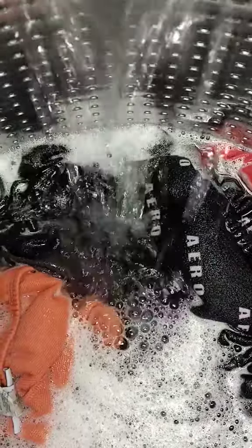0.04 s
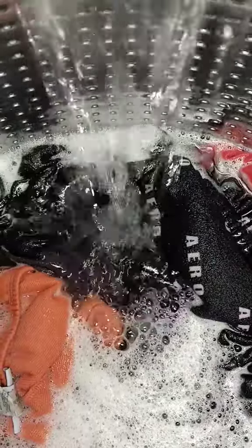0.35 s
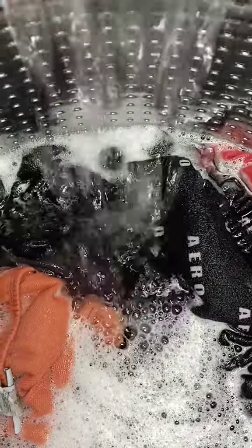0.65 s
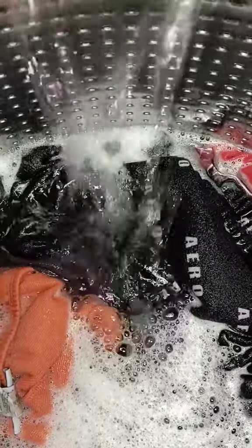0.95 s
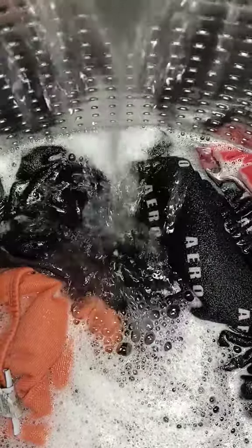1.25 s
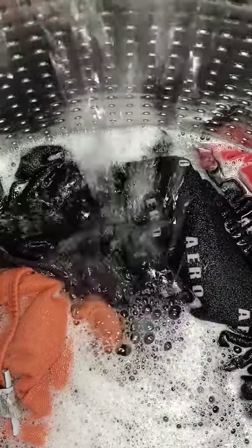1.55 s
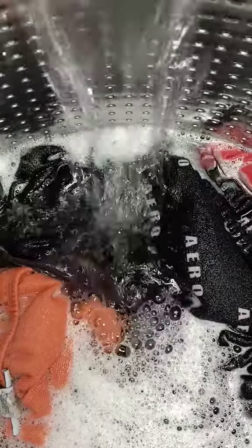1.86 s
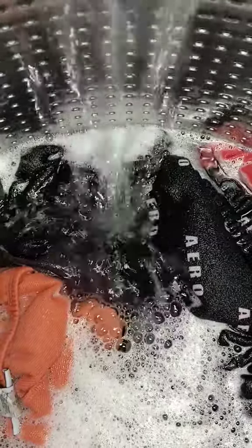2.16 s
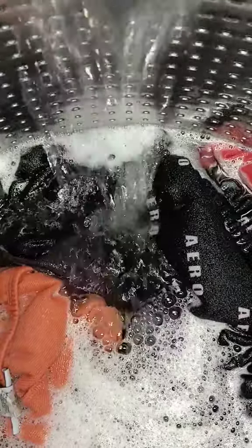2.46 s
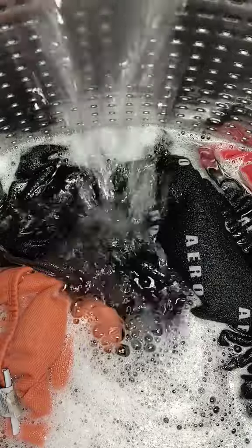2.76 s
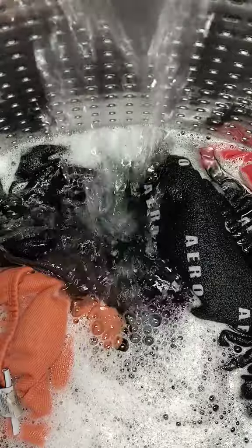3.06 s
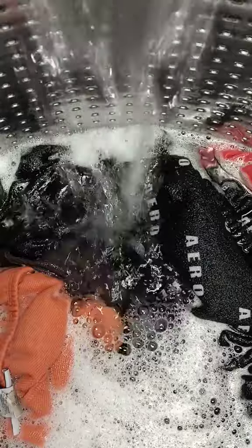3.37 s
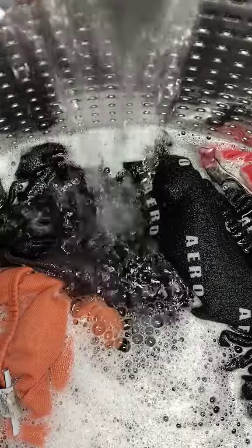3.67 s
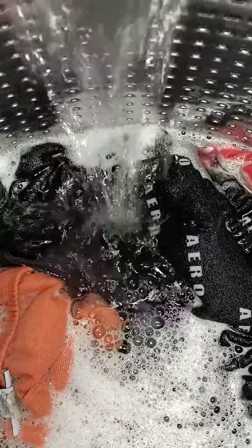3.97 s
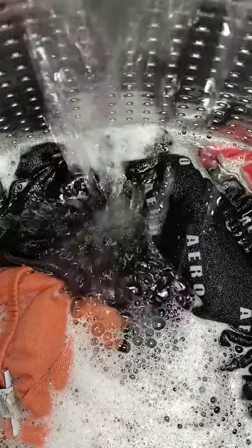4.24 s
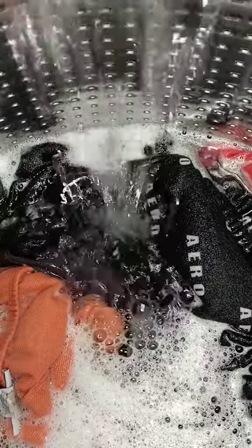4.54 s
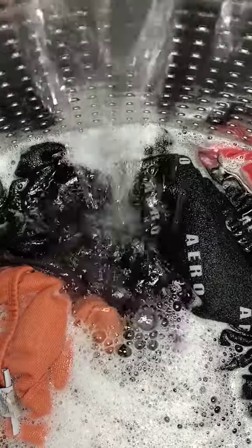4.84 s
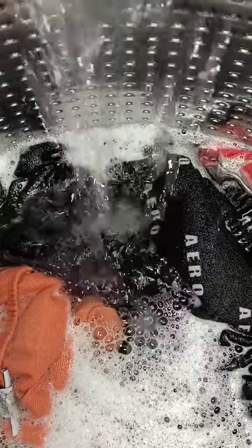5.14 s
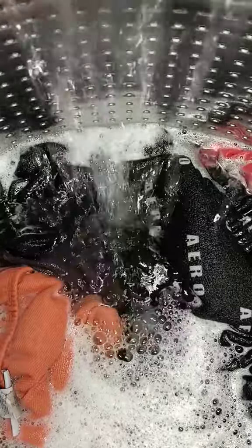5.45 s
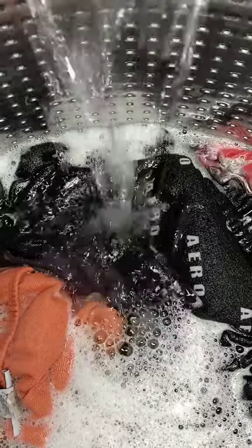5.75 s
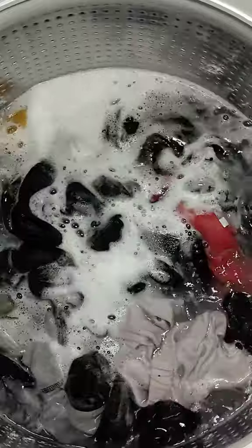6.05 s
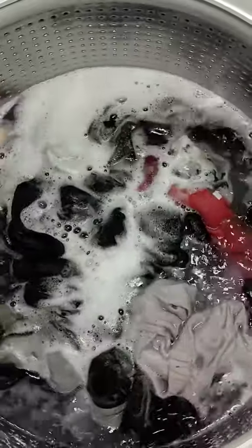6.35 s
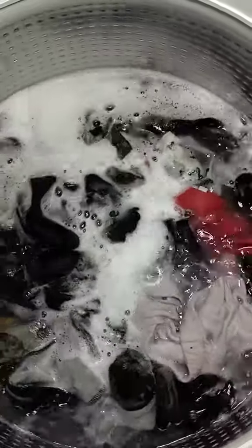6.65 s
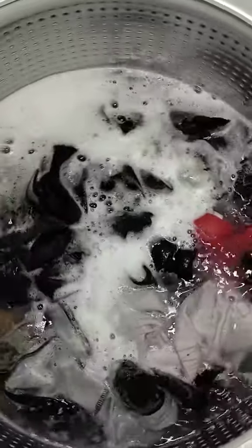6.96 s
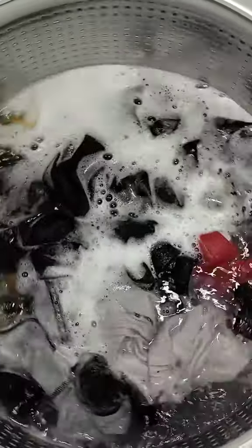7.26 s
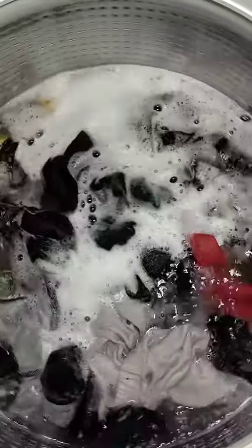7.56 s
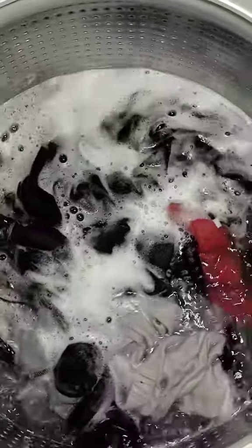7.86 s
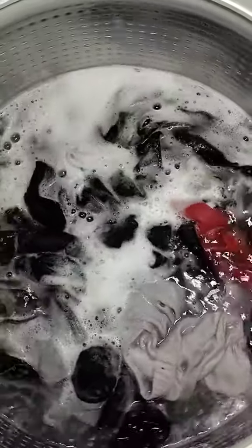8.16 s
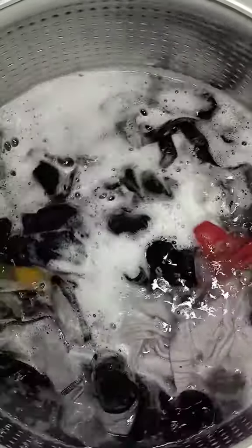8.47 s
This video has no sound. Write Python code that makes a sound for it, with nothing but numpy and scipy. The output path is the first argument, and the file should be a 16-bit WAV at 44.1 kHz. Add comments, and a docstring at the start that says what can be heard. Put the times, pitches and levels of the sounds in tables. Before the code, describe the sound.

Water pours and splashes onto laundry in a washing machine drum, then the washer agitates in three low, churning strokes.

```python
"""First a jet pours onto wet laundry in the steel drum of a top-loading washer: drop impacts and ringing
bubbles excite the drum's resonances, spray hisses and the shaken tub rumbles and thumps.
At 5.6 s the sound cuts off; after a short silence the washer is agitating, in three motor strokes.
Each stroke starts with a knock, groans up to speed, whines at harmonics of the gear mesh rate
while the load churns and the foam fizzes, then coasts down with a falling growl."""
import sys
import numpy as np
from scipy import signal
from scipy.fft import rfft, irfft
from scipy.io import wavfile

SR = 44100
rng = np.random.default_rng(int(sys.argv[2]) if len(sys.argv) > 2 else 0)


def wrap_up_sound(samples):
    """Save the sound to the file named by the first command line argument, as 16-bit audio."""
    columns = np.atleast_2d(samples).T
    # keep every value between -1 and 1, then stretch to whole-number steps
    tamed = np.clip(columns, -1, 1)
    steps = np.round(tamed * 32767).astype(np.int16)
    wavfile.write(sys.argv[1], SR, steps)


N = 375291
T = np.arange(N) / SR
POUR_END_S, WASH_START_S = 5.603, 6.04


def gain_of(db):
    """Amplitude ratio of a level in decibels."""
    return 10 ** (np.asarray(db) / 20)

def unit_rms(x):
    """Normalisation to an rms of 1."""
    return x / np.sqrt(np.mean(x ** 2) + 1e-20)

def add(mix, s, sound):
    """Superposition: a sound joins the mix at time s."""
    part = mix[max(round(s * SR), 0):][:len(sound)]
    part += sound[:len(part)]

def swell(peak_s, half_width_s):
    """Gaussian envelope, down to 1/e one half-width from its peak."""
    return np.exp(-((T - peak_s) / half_width_s) ** 2)

def wander(rate_hz):
    """Random modulation: low-passed noise of rms 1."""
    f = np.fft.rfftfreq(N, 1 / SR)
    return unit_rms(irfft(rfft(rng.standard_normal(N)) / (1 + (f / rate_hz) ** 4), N))

def colour(x, points=None, modes=(), size=8192):
    """Minimum-phase filter: a spectral envelope plus bell-shaped resonances and antiresonances."""
    f, db = np.fft.rfftfreq(size, 1 / SR), np.zeros(size // 2 + 1)
    if points is not None:
        hz, level = np.transpose(points)
        db += np.interp(np.log(f + 1), np.log(hz), level)
    for hz, width, lift in modes:
        db += lift / (1 + (2 * (f - hz) / width) ** 2)
    log_gain = np.log(gain_of(np.r_[db, db[-2:0:-1]]))
    response = np.fft.ifft(np.exp(np.conj(signal.hilbert(log_gain)))).real
    return signal.oaconvolve(x, response[:size // 2])[:len(x)]

def band(x, hz, spread):
    """Band-pass filter from hz / spread to hz * spread."""
    spread = max(spread, 1.05)
    edges = np.clip([hz / spread, hz * spread], 10, SR / 2 - 100)
    return signal.sosfilt(signal.butter(2, edges, "band", fs=SR, output="sos"), x)

def drops(per_s, spread_db):
    """Shot noise: independent impacts, many small and a few large."""
    return (rng.random(N) < per_s / SR) * gain_of(spread_db * np.minimum(rng.exponential(1, N), 3.4))

def spatter(lo_hz, hi_hz, per_s, spread_db, decay_s, crack, bed, count=6):
    """Impact noise: drops crack and puff in bands set by their size, over a bed of merged drops."""
    out = np.zeros(N)
    for hz in np.geomspace(lo_hz, hi_hz, count):
        hits = drops(per_s / count, spread_db)
        power = signal.lfilter([1], [1, -np.exp(-2 / (decay_s * SR))], hits ** 2)
        puffs = np.sqrt(power / power.mean() + bed ** 2) * rng.standard_normal(N)
        out += band(puffs + crack * unit_rms(hits), hz, 1.46)
    return unit_rms(out)

def bubbles(lo_hz, hi_hz, per_s, spread_db, cycles, rise):
    """Bubble resonance: damped oscillations, tuned by size, that rise in pitch near the surface."""
    out, draws = np.zeros(N), rng.random((8000, 4))
    born = draws[:, 3] < per_s * N / SR / len(draws)
    for when, pitch, strength, _ in draws[born]:
        hz = lo_hz * (hi_hz / lo_hz) ** pitch
        age = np.arange(int(5 * cycles / hz * SR)) * hz / cycles / SR  # in decay times
        amplitude = hz * gain_of(spread_db * min(-np.log(1 - strength), 3))
        ring = np.exp(-age) * np.sin(2 * np.pi * cycles * age * (1 + rise * age))
        add(out, when * N / SR, amplitude * ring)
    return unit_rms(out)

def burst(hz, spread, decay_s, crack, ring=0, modes=(), size=4096):
    """Impact transient: a crack, a puff and ringing air filtered by a body; rms 1 over the first 10 ms."""
    t = np.arange(size) / SR
    envelope = np.exp(-t / decay_s)
    puff = rng.standard_normal(size) * envelope
    puff[0] += crack
    bubble = envelope * np.sin(2 * np.pi * hz * t * (1 + 2 * t))
    sound = colour(unit_rms(band(puff, hz, spread)) + ring * unit_rms(bubble), modes=modes)
    return sound / np.sqrt(np.mean(sound[:SR // 100] ** 2))

def drum_echo(x, wet_db, t60_s, above_hz, size=6000):
    """Reverberation: the steel wall reflects the treble back and forth."""
    taps = rng.choice([-1., 1.], size) * (rng.random(size) < .03) * gain_of(-60 * T[:size] / t60_s)
    taps[:SR // 500] = 0  # no reflection in the first 2 ms
    high_pass = signal.butter(3, above_hz, "high", fs=SR, output="sos")
    taps = signal.sosfilt(high_pass, taps / np.linalg.norm(taps))
    return x + gain_of(wet_db) * signal.oaconvolve(x, taps)[:N]

# Resonances and antiresonances of the drum: f/Hz, bandwidth/Hz, gain/dB
DRUM_MODES = [(272, 24, -3.5), (427, 25, 9), (501, 150, 7.5), (651, 21, 4), (693, 31, -5.5),
              (844.4, 45, 10), (1028, 200, 8.5), (1398, 48, 8.5), (1759, 140, 11), (1923, 30, 4.5),
              (2086, 72, 8), (2330, 46, 5.5), (2508, 36, 3.5), (2776, 72, 8), (3100, 70, 7.5),
              (4170, 90, 4.5)]
# Spectrum of the splash: f/Hz, relative level/dB
SPLASH_SPECTRUM = [(300, -29), (900, -15), (1500, -3), (2500, -1), (4400, 0.5), (5700, 0), (6800, -5.5),
                   (10000, -7.5), (16000, -42.5)]
def splash():
    """Impacts and entrained bubbles excite the drum's modes as the jet breaks up in clumps."""
    splats = spatter(1070, 6500, per_s=310, spread_db=5.5, decay_s=0.014, crack=0.13, bed=0.69)
    splats += gain_of(-9.5) * bubbles(1200, 5000, per_s=400, spread_db=5, cycles=13, rise=0.01)
    air_pockets = gain_of(-9) * bubbles(1600, 2400, per_s=90, spread_db=4, cycles=15, rise=0.022)
    clumping = gain_of(1.14 * wander(15))
    in_drum = colour((splats + air_pockets) * clumping, SPLASH_SPECTRUM, DRUM_MODES)
    return gain_of(-35.5) * unit_rms(drum_echo(in_drum, wet_db=-10.5, t60_s=0.48, above_hz=2500))

# Spectrum of the gurgle: f/Hz, relative level/dB
GURGLE_SPECTRUM = [(100, -25), (190, -1), (280, -2.5), (500, -6.5), (680, -3), (1000, -6), (1300, -3.5),
                   (2000, -21.5), (5000, -25.5)]
def gurgle():
    """Larger bubbles resonate lower, among dull impacts in the drum."""
    glugs = spatter(220, 1630, per_s=190, spread_db=1.5, decay_s=0.012, crack=0.31, bed=0.29)
    glugs += gain_of(-9) * bubbles(350, 1400, per_s=130, spread_db=7, cycles=6.9, rise=0.025)
    return gain_of(-41.5) * unit_rms(colour(glugs, GURGLE_SPECTRUM, DRUM_MODES))

# Spectrum of the spray: f/Hz, relative level/dB
SPRAY_SPECTRUM = [(2000, -26), (5000, -12.5), (7000, -9.5), (8500, -9), (11200, -1), (12000, -4),
                  (13500, 3), (16000, -2)]
def spray():
    """The smallest drops and bubbles radiate the highest frequencies."""
    mist = spatter(8000, 14000, per_s=390, spread_db=6, decay_s=0.013, crack=0.2, bed=0.8, count=2)
    mist += gain_of(-11.5) * bubbles(6500, 15000, per_s=430, spread_db=5, cycles=30, rise=.004)
    return gain_of(-39.5) * unit_rms(colour(mist, SPRAY_SPECTRUM))

# Moments when the jet falls slack: t/s, half-width/s, gain/dB
JET_LULLS = [(0.595, 0.023, -5), (0.961, 0.018, -5), (1.397, 0.046, -5), (3.948, .05, -2.5),
             (5.409, 0.03, -2)]
def jet():
    """Flow modulates level: the jet slackens at times, and thins as each big gout draws water from it."""
    slack = gain_of(sum(db * swell(s, half_width) for s, half_width, db in JET_LULLS))
    thinning = gain_of(-5.5 * sum(swell(s - 0.005, 0.0065) for s, *_ in BIG_GOUTS))
    return ((splash() + gurgle()) * slack + spray()) * thinning

# Spectrum of the tub's rumble: f/Hz, relative level/dB
RUMBLE_SPECTRUM = [(20, -22), (38, -21), (51, 0), (85, -0.5), (105, 1), (122, 4.5), (140, -3.5), (150, -5),
                   (175, -22.5), (300, -30.5)]
def rumble():
    """Forced vibration: the tub shakes unevenly under the jet."""
    return gain_of(-38.5 + 1.5 * wander(22)) * unit_rms(colour(rng.standard_normal(N), RUMBLE_SPECTRUM))

# Hum while filling: harmonic number, level/dB
FILLING_HARMONICS = [(1, -45), (2, -61.5)]
def hum(harmonics, waver, waver_hz, hum_hz=120):
    """Mains hum: a harmonic series wavering in amplitude and phase."""
    out, phase = np.zeros(N), 2 * np.pi * hum_hz * T
    for k, db in harmonics:
        amplitude = gain_of(db) * np.sqrt(2) * (1 + waver * wander(waver_hz))
        out += amplitude * np.sin(k * phase + waver * wander(8.4))
    return out

# Sharpest impacts of drops on steel: t/s, relative level/dB
LOUD_TICKS = [(0.0328, -18), (0.059, -12), (0.1756, -9), (0.2448, -17), (0.6752, -15.5), (1.0133, -14),
              (1.121, -26), (1.829, -9), (2.2624, -16), (2.5847, -9), (3.066, -20.5), (3.2456, -18),
              (3.3662, -15), (3.738, -10), (3.7927, -25), (3.8312, -27), (3.872, -13), (4.0297, -19),
              (4.1037, -30), (4.1533, -10), (4.5687, -14), (4.8313, -6), (4.937, -9), (5.144, -13)]
# Spectral shaping of a tick: f/Hz, gain/dB
TICK_SPECTRUM = [(400, -24.5), (2000, -7), (4500, 4), (7500, -8), (14000, -3.5)]
def ticks():
    """Brief contact gives a broad spectrum: fast drops tick on steel, a few loud over a fine patter."""
    hits = gain_of(-48) * unit_rms(drops(per_s=60, spread_db=3.5) * rng.choice([-1., 1.], N))
    for s, db in LOUD_TICKS:
        hits[round(s * SR)] += gain_of(db + 2.5)
    slap = 0.27 * rng.standard_normal(256) * np.exp(-T[:256] / 0.00095)
    slap[0] = 1
    return colour(signal.oaconvolve(hits, slap)[:N], TICK_SPECTRUM, size=1024)

def splat(hz, spread, ring, landing_s, decay_s, crack, count=5, size=4096):
    """Close impacts fuse into one, each with a puff and a rising bubble; rms 1 over the first 10 ms."""
    puff_power, ringing = np.zeros((2, size))
    for k, (when, pitch, phase) in enumerate(rng.random((count, 3))):
        onset = landing_s * (k + when * (k > 0)) / count
        age = np.maximum(T[:size] - onset, 0)
        envelope = gain_of(-2 * k) * np.minimum(age / 0.00034, 1) * np.exp(-age / decay_s)
        bubble_hz = hz * spread ** (.9 * (pitch - .5))
        puff_power += envelope ** 2
        ringing += envelope * np.sin(2 * np.pi * (phase + bubble_hz * age * (1 + 6 * age)))
    puff = rng.standard_normal(size) * np.sqrt(puff_power)
    puff[SR // 1000] += crack
    sound = unit_rms(band(puff, hz, spread)) + ring * unit_rms(ringing)
    sound = colour(sound, modes=DRUM_MODES, size=4096)
    return sound / np.sqrt(np.mean(sound[:SR // 100] ** 2))

def small_gouts(count=26, lo_hz=1014, hi_hz=6480):
    """Random scatter of lesser gouts, as rows like BIG_GOUTS: finer ones sound higher and spray more."""
    rows = []
    for k, (when, strength, fineness) in enumerate(rng.random((count, 3))):
        s = POUR_END_S * (k + when) / count
        db = -39 + 8.5 * (2 * strength - 1)
        hz = lo_hz * (hi_hz / lo_hz) ** fineness
        rows.append((s, db, hz, 1.35, -35.5 + 9 * (fineness - .5)))
    return rows

# Big gouts hitting the load: t/s, onset level/dB, centre f/Hz, band spread (ratio), spray level/dB
BIG_GOUTS = [(0.032, -31, 2780, 2.5, -41), (0.061, -30.5, 4770, 1.2, -25.5),
             (0.157, -30.5, 2120, 1.26, -41), (0.565, -36.5, 5550, 1.2, -28.5), (0.674, -27, 3020, 2, -48),
             (0.812, -33.5, 1780, 2, -37), (1.008, -30.5, 5020, 1.15, -35), (1.12, -27.5, 1860, 1.7, -58.5),
             (1.263, -31, 1760, 1.7, -48), (1.756, -28.5, 1043, 2.5, -34), (2.258, -29, 2350, 2, -29),
             (2.315, -27, 1704, 1.23, -46), (2.455, -23.5, 1946, 1.44, -51),
             (2.505, -27.5, 1784, 1.86, -35), (2.524, -28.5, 4200, 2.1, -43), (3.043, -34, 4900, 1.2, -35),
             (3.096, -31.5, 1150, 1.42, -34), (3.365, -31.5, 4280, 1.2, -36),
             (3.533, -29.5, 1830, 1.14, -52), (3.792, -28.5, 1860, 1.14, -53),
             (3.829, -29.5, 1320, 1.56, -45), (3.88, -30, 2100, 1.12, -37), (4.103, -36, 690, 1.8, -29),
             (4.864, -30.5, 1980, 1.5, -45), (4.906, -30.5, 940, 1.4, -44), (5.343, -30, 1786, 2.3, -37)]
def gouts():
    """Impact and air entrainment: each gout slaps the load, throws up spray and gurgles or rings."""
    out = np.zeros(N)
    for s, db, hz, spread, spray_db in BIG_GOUTS + small_gouts():
        if hz < 1200:  # low gouts gurgle, higher ones ring with trapped air
            body = splat(hz, spread, ring=.3, landing_s=0.0036, decay_s=0.011, crack=9.9)
        else:
            body = splat(hz, spread, ring=0.54, landing_s=.005, decay_s=0.01, crack=9.1)
        slap = gain_of(-13.5) * burst(2000, spread=3, decay_s=0.002, crack=6)
        mist = burst(12000, spread=1.78, decay_s=0.016, crack=1.6)
        add(out, s, gain_of(db) * (body + slap) + gain_of(spray_db) * mist)
    return out

# Dense clusters of drops from the swinging jet: t/s, half-width/s, level/dB, centre f/Hz
DROP_CLUSTERS = [(0.25, 0.022, -30.5, 1940), (0.314, 0.045, -34, 3330), (1.867, 0.11, -39, 2500),
                 (3.563, 0.033, -33, 2700), (3.69, 0.058, -36, 2220), (4.29, 0.044, -35.5, 2080),
                 (5.15, 0.053, -36, 4700), (5.305, 0.028, -36, 2000)]
def clusters():
    """Incoherent summation: where the jet bunches up, slaps and bubbles merge into a swell of noise."""
    crowd = spatter(500, 7500, per_s=720, spread_db=-0.5, decay_s=.006, crack=0.12, bed=0.3)
    crowd += gain_of(-6.5) * bubbles(600, 5000, per_s=800, spread_db=4, cycles=7, rise=0.022)
    crowd = colour(crowd, modes=DRUM_MODES)
    return sum(gain_of(db) * swell(s, half_width) * unit_rms(band(crowd, hz, 1.41))
               for s, half_width, db, hz in DROP_CLUSTERS)

def resonance(s, db, hz, half_width_s):
    """A single mode builds up to its peak at time s and dies away."""
    return gain_of(db) * np.sqrt(2) * swell(s, half_width_s) * np.sin(2 * np.pi * hz * (T - s))

# Thumps of the tub: t/s, level/dB, f/Hz
TUB_THUMPS = [(0.53, -31, 122), (4.128, -32.5, 118.5), (3.17, -35.5, 125.4), (5.47, -30, 122.5),
              (6.262, -38, 127.2), (6.667, -33.5, 139.5), (6.8, -52, 133), (6.885, -48, 123),
              (7.09, -28.5, 136), (7.7, -43, 139), (7.88, -35, 128), (7.485, -28, 146), (7.626, -31.5, 140),
              (7.99, -32, 143), (8.285, -23.5, 141.6)]
def thumps():
    """Low resonance of the tub, excited by the jet and later by the shifting load."""
    return sum(resonance(s, db, hz, half_width_s=0.035) for s, db, hz in TUB_THUMPS)

# Heavy slugs of water: t/s, onset level/dB, centre f/Hz, band spread (ratio), relative ring level/dB
WATER_SLUGS = [(1.168, -29.5, 288, 1.53, -31.5), (1.4874, -27.5, 640, 1.5, -34),
               (3.427, -35, 607, 1.6, -46), (4.176, -30.5, 750, 1.6, -36), (5.212, -38, 400, 2.3, -30.5),
               (5.262, -34, 700, 2.6, -35.5)]
def slugs(ring_hz=431, ring_decay_s=0.022):
    """Impulse excitation: a slug of water thuds into the load and the drum's lowest resonance rings on."""
    out, t = np.zeros(N), T[:SR // 6]
    ring = 2 * (1 - np.exp(-t / 0.0068)) * np.exp(-t / ring_decay_s) * np.sin(2 * np.pi * ring_hz * t)
    for s, db, hz, spread, ring_db in WATER_SLUGS:
        add(out, s, gain_of(db) * burst(hz, spread, decay_s=0.015, crack=16))
        add(out, s, gain_of(ring_db) * ring)
    return out

# Motor strokes: t/s, driven time/s, then relative level/dB of knock, groan, load, first splash, run-down
MOTOR_STROKES = [(6.214, .42, -41.5, -26, -1, -65, -45.5), (7.02, .46, -40, -25, 0.5, -51, -32.5),
                 (7.831, .425, -41, -26, 0.5, -57, -40.5)]
def stirred(db, lag_s, rise_s, overrun_s, fall_db_per_s):
    """Envelope of a driven, damped system: it rises, holds while the motor pulls, then decays."""
    envelope = np.zeros(N)
    for s, length, _, _, load_db, *_ in MOTOR_STROKES:
        attack = np.clip((T - s - lag_s) / rise_s, 0, 1)
        released = np.maximum(T - s - length - overrun_s, 0)
        envelope += attack * gain_of(db + load_db - fall_db_per_s * released)
    return envelope

# Spectrum of the tub's boom: f/Hz, relative level/dB
BOOM_SPECTRUM = [(20, -38), (40, -23), (62, -9), (95, -12), (115, 5.5), (143, 8.5), (160, 10.5),
                 (180, -14.5), (300, -57), (1500, -100)]
def boom():
    """Forced vibration: the tub booms through each stroke, with a surge at the first jerk."""
    envelope = gain_of(-60) + stirred(-37, lag_s=0.014, rise_s=0.031, overrun_s=.01, fall_db_per_s=72)
    envelope += gain_of(-38) * sum(swell(s + 0.061, 0.017) for s, *_ in MOTOR_STROKES)
    return envelope * unit_rms(colour(rng.standard_normal(N), BOOM_SPECTRUM))

# Resonances and antiresonances of the cabinet: f/Hz, bandwidth/Hz, gain/dB
CABINET_MODES = [(273, 12, 5.5), (387, 36, 8.5), (446, 43, -4.5), (519, 11, -1), (594, 28, 4), (655, 24, 6),
                 (702, 18, -5), (720, 16, 9), (870, 50, 2), (965, 46, -9), (1220, 54, 3), (1380, 50, -1.5),
                 (1654, 27, 8), (1990, 48, 9.5), (2550, 200, 1.5)]
# Spectrum of the churning load: f/Hz, relative level/dB
CHURN_SPECTRUM = [(60, -42), (120, -21), (190, -1), (260, 0.5), (400, -0.5), (500, 1.5), (700, -10),
                  (1000, -3.5), (2500, -43.5), (8000, -96)]
def churn():
    """Wet laundry sloshes through the cabinet's modes and bubbles resonate, building with the speed."""
    envelope = gain_of(-63) + stirred(-40.5, lag_s=.002, rise_s=0.03, overrun_s=0.031, fall_db_per_s=79)
    envelope += stirred(-54, lag_s=0.23, rise_s=0.049, overrun_s=-0.033, fall_db_per_s=167)
    slosh = spatter(148, 1650, per_s=320, spread_db=2.5, decay_s=0.0094, crack=0.21, bed=1)
    water = unit_rms(colour(slosh, CHURN_SPECTRUM, CABINET_MODES))
    water += gain_of(-10) * bubbles(350, 900, per_s=160, spread_db=0, cycles=6, rise=0.014)
    return envelope * unit_rms(water)

# Spectrum of the drive noise: f/Hz, relative level/dB
RATTLE_SPECTRUM = [(60, -38), (300, -11.5), (600, -6), (950, -0.5), (1400, -4), (2050, -9.5), (2500, -16.5),
                   (3500, -17), (8000, -75), (16000, -73)]
def rattle():
    """Structure-borne noise: the drive rattles the cabinet, building with the speed."""
    envelope = gain_of(-66.5) + stirred(-50, lag_s=.003, rise_s=0.013, overrun_s=0.047, fall_db_per_s=66)
    envelope += stirred(-52.5, lag_s=0.083, rise_s=0.037, overrun_s=-0.07, fall_db_per_s=200)
    rough_noise = rng.standard_normal(N) * (1 + 0.18 * wander(70))
    return envelope * unit_rms(colour(rough_noise, RATTLE_SPECTRUM, CABINET_MODES))

# Spectrum of the foam: f/Hz, relative level/dB
FOAM_SPECTRUM = [(100, -44), (1200, -17), (2600, 1.5), (3500, 2), (5000, -2), (5900, -10), (7500, -13),
                 (8500, -19), (11000, -21.5), (14300, -21), (15100, -38)]
# Water draining through the foam ahead of a stroke: t/s, half-width/s, level/dB
FOAM_DRAINS = [(6.166, 0.047, -80), (6.97, 0.08, -61.5)]
# Waves of suds breaking at the height of a stroke: t/s, half-width/s, level/dB
FOAM_CRESTS = [(6.447, .06, -67), (6.604, 0.11, -67), (7.265, 0.054, -61), (7.408, 0.041, -59),
               (8.089, 0.12, -61)]
def foam():
    """Bursting bubbles sum to a fizz that swells as water drains, the load jerks and waves break."""
    pops = spatter(1500, 13000, per_s=440, spread_db=8, decay_s=0.0073, crack=.1, bed=2.7)
    fizz = unit_rms(colour(pops, FOAM_SPECTRUM))
    fizz += gain_of(-16) * bubbles(1000, 2600, per_s=230, spread_db=8, cycles=11, rise=0.014)
    stir = gain_of(-80.5) + stirred(-56, lag_s=0.075, rise_s=0.087, overrun_s=-0.021, fall_db_per_s=93)
    drains = sum(gain_of(db) * swell(s, half_width) for s, half_width, db in FOAM_DRAINS)
    crests = sum(gain_of(db) * swell(s, half_width) for s, half_width, db in FOAM_CRESTS)
    jerks = np.zeros(N)
    for s, *_, splash_db, _ in MOTOR_STROKES:
        age = np.maximum(T - s - .012, 0) / 0.019  # in rise times
        jerks += gain_of(splash_db) * age * np.exp(1 - age)
    out = stir * unit_rms(fizz)
    for envelope, hz, spread in (drains, 2830, 2), (jerks, 3300, 1.95), (crests, 6300, 1.96):
        out += envelope * unit_rms(band(fizz, hz, spread))
    faint_suds = spatter(8000, 12300, per_s=200, spread_db=7, decay_s=.004, crack=.1, bed=1.5, count=2)
    return out + gain_of(-83) * faint_suds

def knocks():
    """Backlash: each stroke takes up the slack with a double knock that excites the cabinet's modes."""
    out = np.zeros(N)
    for s, _, knock_db, *_ in MOTOR_STROKES:
        first = burst(587, spread=1.15, decay_s=0.024, crack=7.9, ring=0.48, modes=CABINET_MODES)
        second = burst(570, spread=1.7, decay_s=0.033, crack=4.4, modes=CABINET_MODES)
        add(out, s, gain_of(knock_db) * band(first, 600, 1.8))
        add(out, s + 0.021, gain_of(knock_db) * second)
    return out

def groans(pitch_hz=630, climb_hz_per_s=1550, peak_s=.097, judder_hz=108):
    """Amplitude and phase modulation: the starting motor judders on the cabinet with a rough tone."""
    out, from_peak = np.zeros(N), T[:SR // 4] - peak_s
    envelope = np.exp(np.minimum(from_peak, 0) / 0.024 - (np.maximum(from_peak, 0) / 0.024) ** 4)
    for s, _, _, groan_db, *_ in MOTOR_STROKES:
        wobble, slip, rasp = rng.standard_normal((3, len(from_peak)))
        hz = pitch_hz + climb_hz_per_s * np.clip(from_peak, -.016, .016)
        hz += 22 * unit_rms(band(wobble, 60, 2))
        judder_rate = judder_hz * (1 + .25 * unit_rms(band(slip, 40, 2)))
        judder = np.cos(2 * np.pi * np.cumsum(judder_rate) / SR)
        tone = (1 + .55 * judder) * np.sin(2 * np.pi * np.cumsum(hz) / SR + .45 * judder)
        tone += .25 * unit_rms(band(rasp, pitch_hz, 1.25))
        add(out, s, gain_of(groan_db) * envelope * tone)
    return out

# Water slopping against the drum wall: t/s, onset level/dB, centre f/Hz
WALL_SLOPS = [(6.253, -53, 3730), (6.799, -57.5, 3440), (6.848, -53.5, 1930), (6.892, -63, 2980),
              (7.135, -52, 1950), (7.635, -62, 1780), (7.941, -48, 1570), (8.43, -59, 4000),
              (8.491, -52, 2130)]
def slops():
    """Water striking the wall gives a narrow-band transient with a little ring of trapped air."""
    out = np.zeros(N)
    for s, db, hz in WALL_SLOPS:
        add(out, s, gain_of(db) * burst(hz, spread=1.15, decay_s=0.034, crack=3, ring=0.25))
    return out

# Hum while the motor pulls: harmonic number, relative level/dB
MOTOR_HARMONICS = [(2, -39.5), (5, -46), (6, -49)]
# Drive tones at full speed: multiple of the mesh rate, relative level/dB
WHINE_HARMONICS = [(2, -1), (3, -2), (4, -3.5), (5, -3.5), (6, -4.5), (7, -8.5), (8, -12), (10, -13),
                   (11, -19), (12, -17.5)]
# Gear tones while coasting: multiple of the mesh rate, relative level/dB
GROWL_HARMONICS = [(2, -5), (3, -5.5), (4, -12), (5, -11)]
def motor(mesh_hz=166.1, spin_up_s=.19, coast_s=.35):
    """Gear-mesh harmonics follow the speed: a whine over hum under load, a falling growl on release."""
    speed, pull, coasting = np.zeros((3, N))
    for s, length, _, _, load_db, _, coast_db in MOTOR_STROKES:
        age, released = np.maximum(T - s, 0), np.maximum(T - s - length, 0)
        spin_up = np.sin(np.pi / 2 * np.minimum(age / spin_up_s, 1))
        speed += spin_up * np.maximum(1 - released / coast_s, 0)
        pull += gain_of(load_db) * np.minimum(age / 0.2, 1) * np.exp(-released / 0.049)
        coasting += np.minimum(released / 0.049, 1) * gain_of(coast_db - 59 * released)
    phase = 2 * np.pi * np.cumsum(mesh_hz * speed * (1 + 0.0075 * wander(7.25))) / SR
    whine = sum(gain_of(db) * (1 + 0.56 * wander(11)) * np.sin(k * phase + 0.71 * wander(28))
                for k, db in WHINE_HARMONICS)
    growl = sum(gain_of(db) * np.sin(k * phase + 0.82 * wander(45)) for k, db in GROWL_HARMONICS)
    driven = gain_of(-41) * whine * speed ** 4 + hum(MOTOR_HARMONICS, waver=0.42, waver_hz=14)
    return pull * driven + coasting * growl * np.minimum(2 * speed, 1)

# Ringing of the cabinet panels: t/s, level/dB, f/Hz
PANEL_TONES = [(6.45, -36, 337), (6.5, -39, 391), (7.435, -39, 848), (7.465, -33, 403), (7.955, -39, 835),
               (8.085, -41, 332), (8.09, -43, 490), (8.09, -41.5, 1003), (8.168, -40, 510)]
def panels():
    """Sympathetic resonance: a cabinet panel rings up briefly under the drive."""
    return sum(resonance(s, db, hz, half_width_s=0.027) for s, db, hz in PANEL_TONES)

def scene():
    """Superposition of the sources: the filling, a gap of silence, then the agitation."""
    filling = jet() + rumble() + hum(FILLING_HARMONICS, waver=0.65, waver_hz=19)
    filling += ticks() + gouts() + clusters() + slugs()
    filling *= np.clip((POUR_END_S - T) / 0.0042, 0, 1)
    washing = boom() + churn() + rattle() + foam() + knocks() + groans() + slops() + motor()
    washing *= np.clip((T - WASH_START_S) / 0.08, 0, 1) ** 2
    return (filling + thumps() + washing + panels())[None]

def record(dry):
    """Band limiting: a steep low-pass filter at 15.9 kHz."""
    low_pass = signal.firwin(511, 15900, window=("kaiser", 9), fs=SR)
    return signal.oaconvolve(dry, low_pass[None], "same")


dry = scene()
out = record(dry)
wrap_up_sound(out)
```